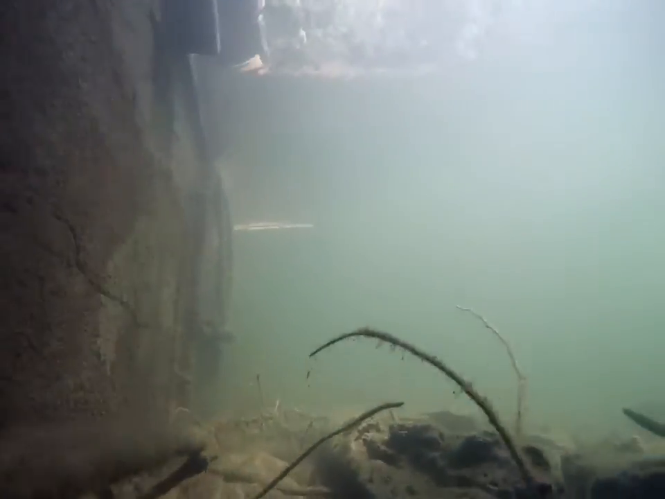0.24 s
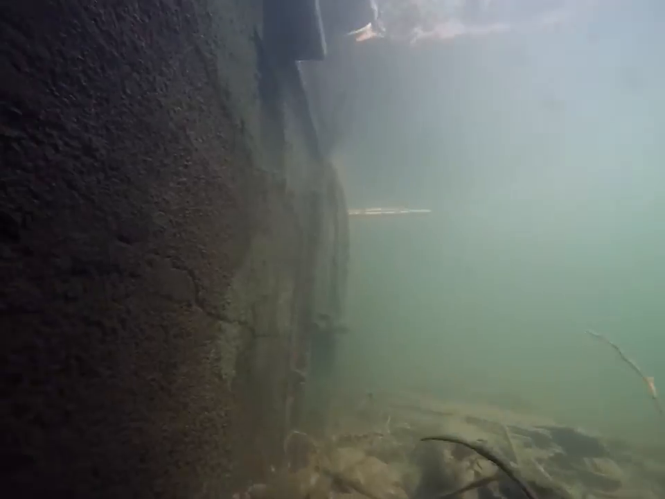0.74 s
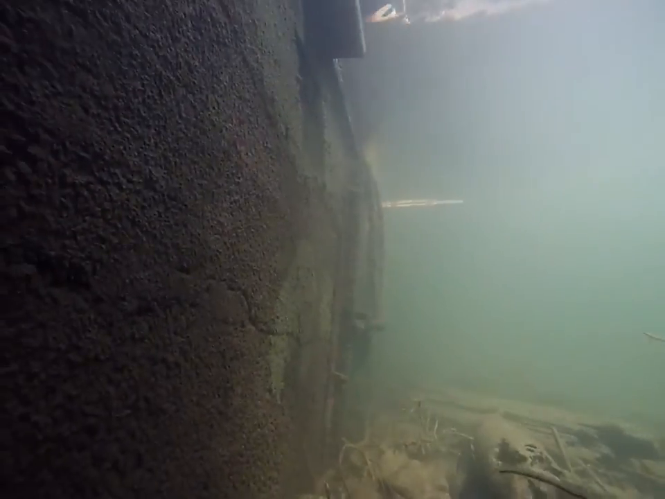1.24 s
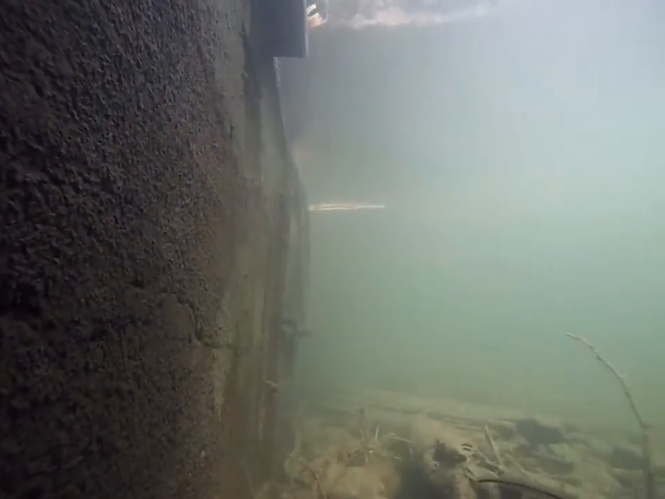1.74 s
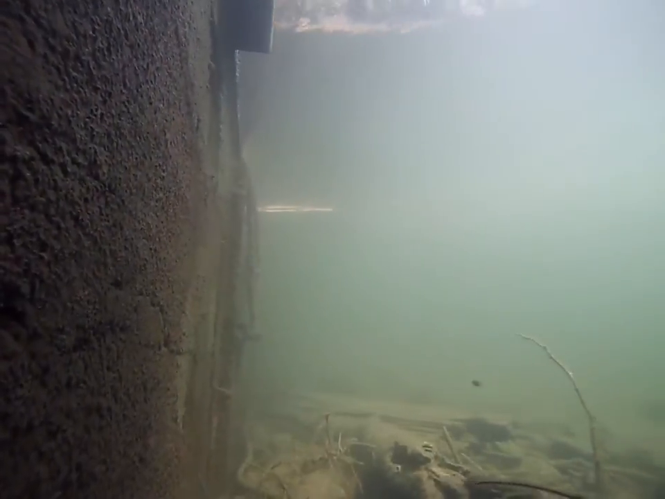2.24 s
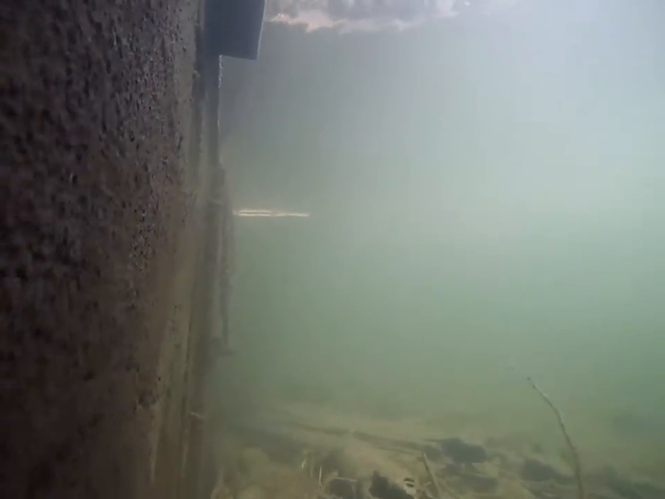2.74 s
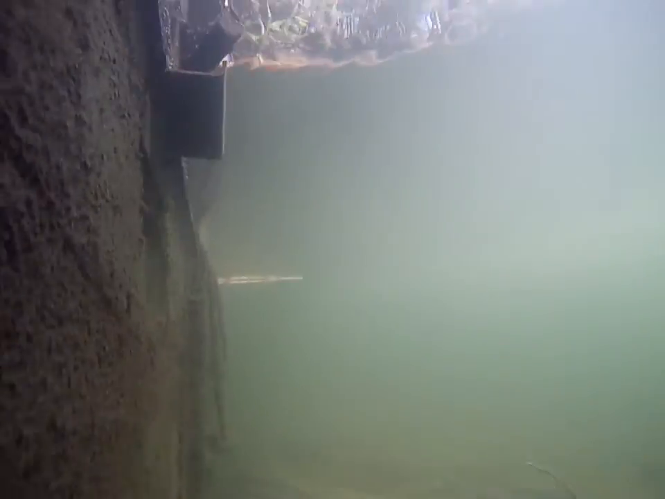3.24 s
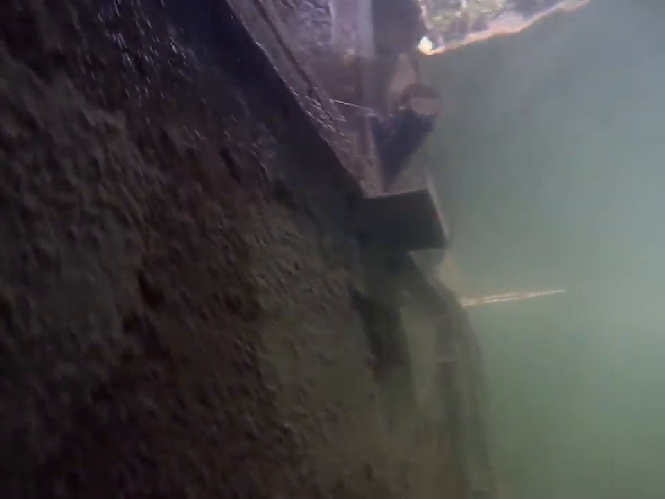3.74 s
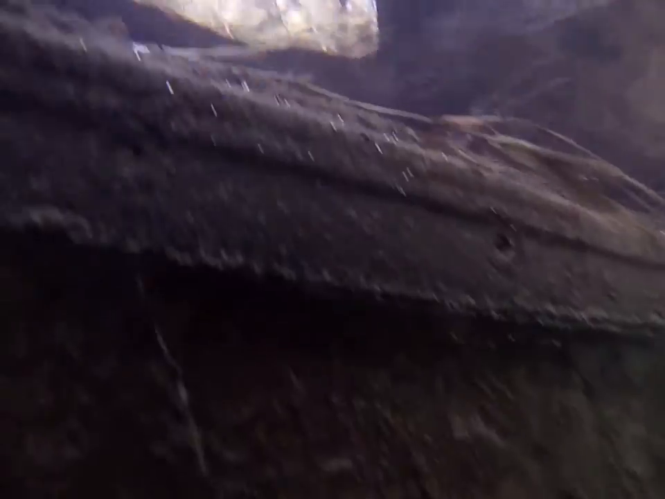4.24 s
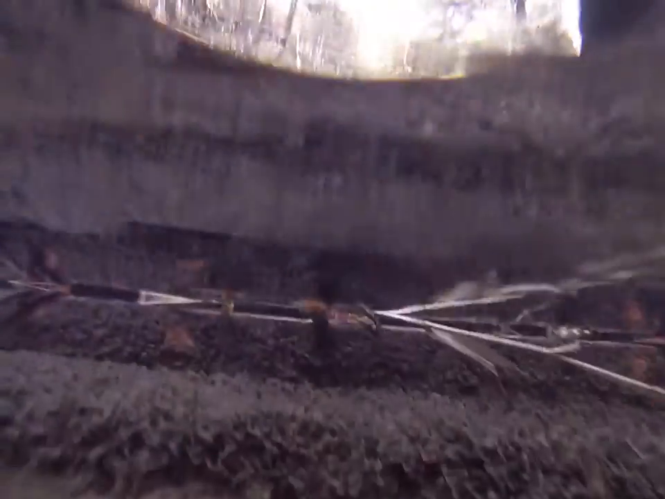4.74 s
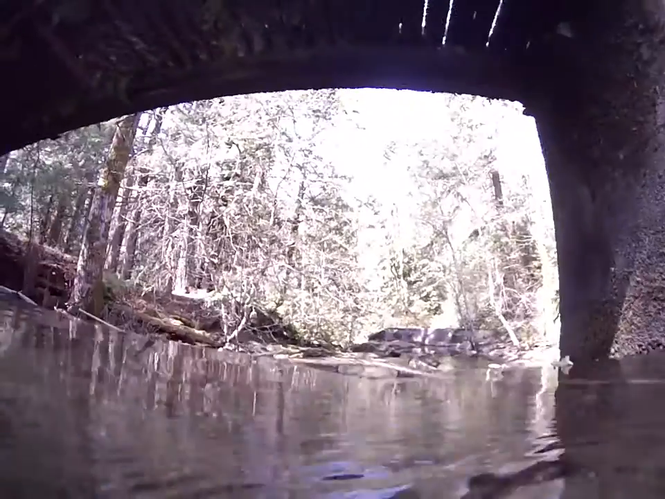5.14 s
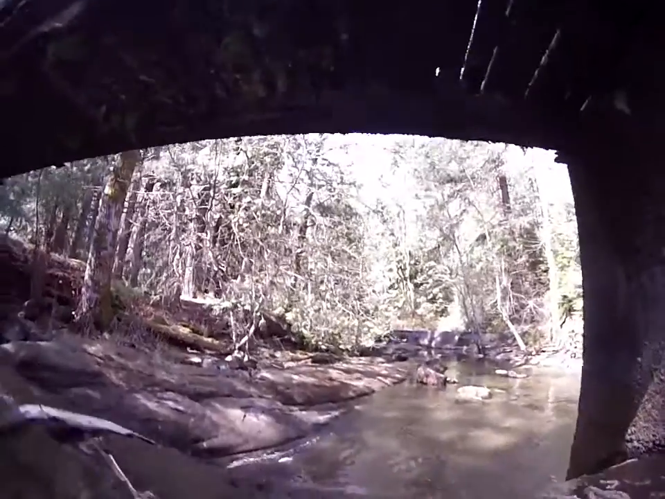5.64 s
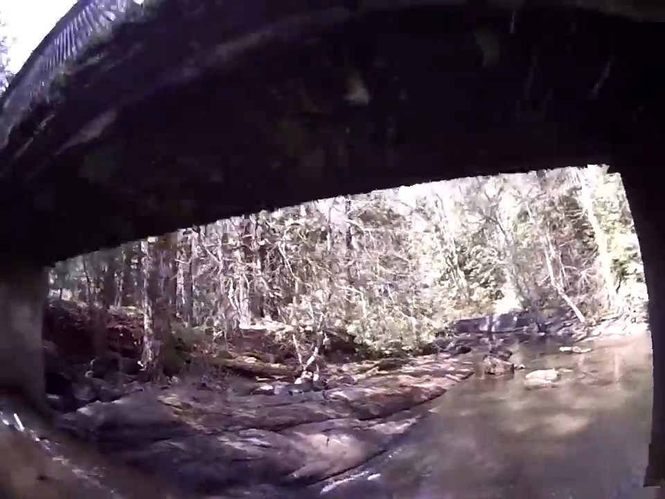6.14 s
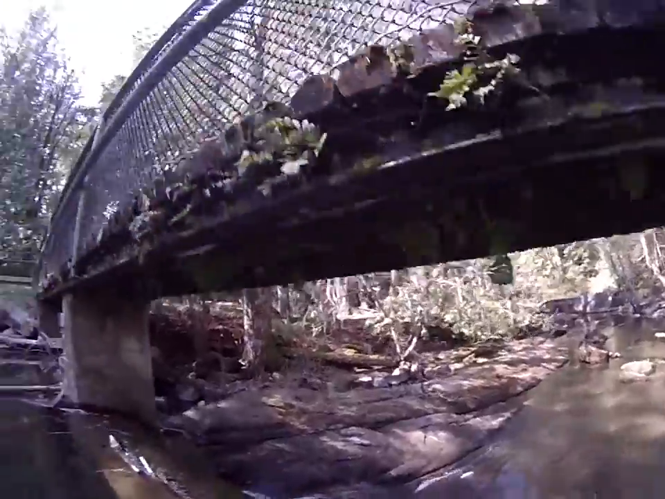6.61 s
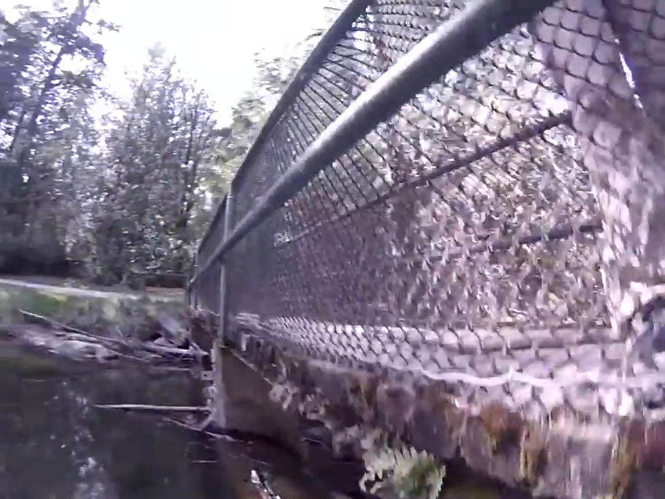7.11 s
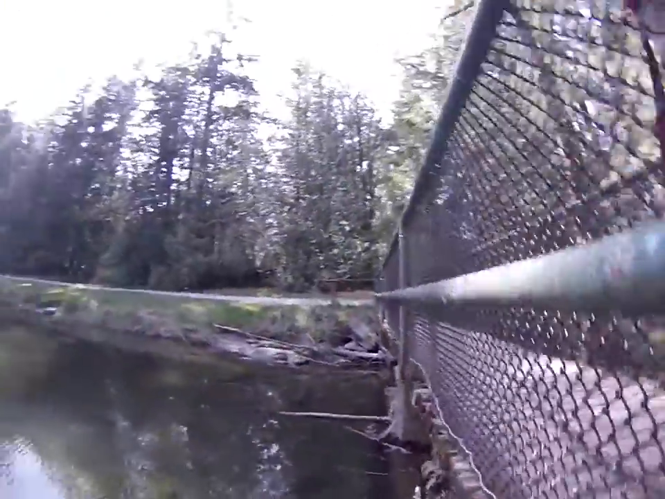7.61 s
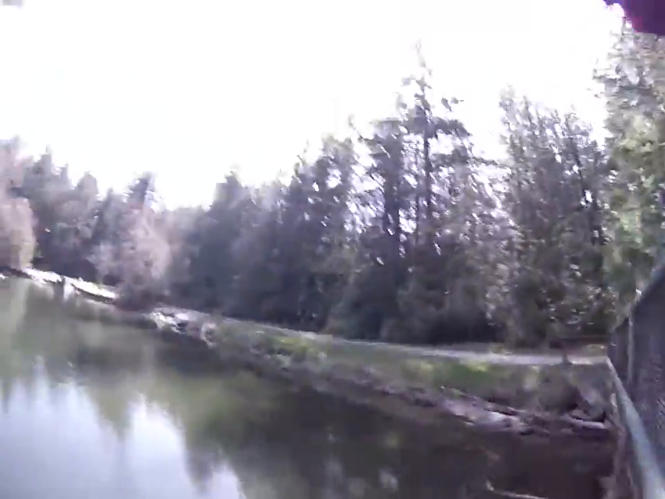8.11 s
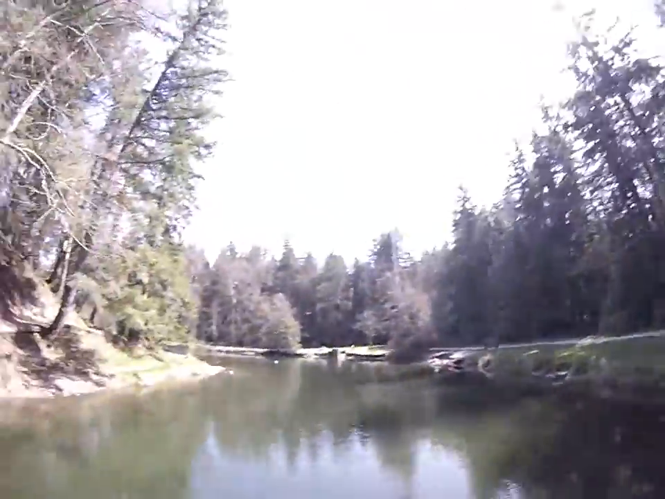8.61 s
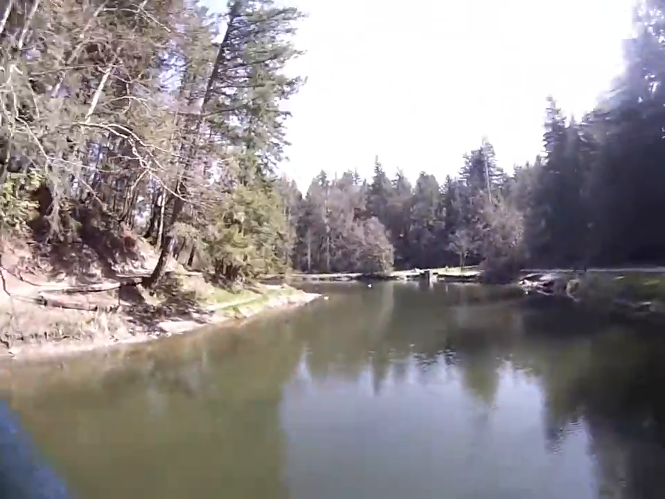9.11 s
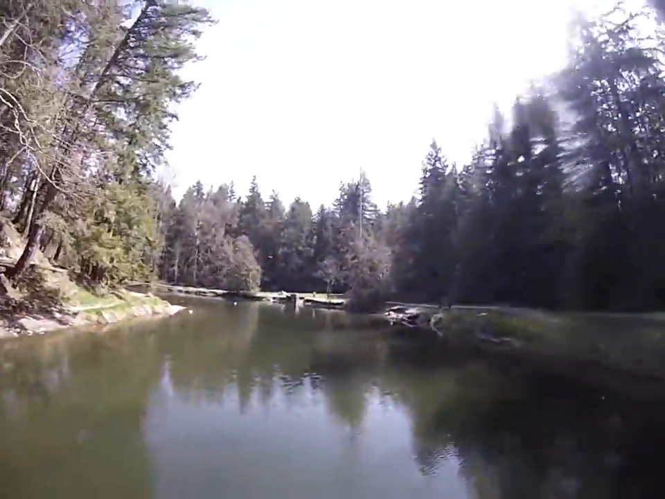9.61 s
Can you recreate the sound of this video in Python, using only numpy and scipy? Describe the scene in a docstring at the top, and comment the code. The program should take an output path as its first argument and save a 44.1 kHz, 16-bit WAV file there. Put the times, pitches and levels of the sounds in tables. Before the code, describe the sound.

Heard from inside a sealed plastic housing on a pole: a burst of loud, boomy knocks and scrapes, then low humming shudders over dull underwater hiss. Bubbles blip upward and hollow ticks follow as it rises. In open air a faint stream hisses through the shell, the mount trembles in short buzzing bursts, and fingers finally knock and rub the case loudly.

```python
"""Camera housing lifted from a pond

A camera in a sealed plastic housing is lifted on a pole out of a pond and then handled.
Filtered noise makes the water hiss, the stream heard through the shell, and the shaking of the sprung mount.
Pushes set the mount swinging; air pockets pop as climbing tones, and soft pings swell and fade.
Fingers rub in grains of noise and tap the shell's resonances. The gain control ducks after loud knocks.
"""
import sys
import numpy as np
from scipy import signal
from scipy.fft import rfft, irfft, next_fast_len
from scipy.io import wavfile
from scipy.ndimage import uniform_filter1d, map_coordinates

SR = 44100
rng = np.random.default_rng(int(sys.argv[2]) if len(sys.argv) > 2 else 0)


def unload_audio(sound):
    """Save the sound as a 16-bit wav file, at the path given as the first command line argument."""
    columns = np.transpose(np.atleast_2d(sound))
    # keep every value between -1 and 1, then stretch to whole-number steps
    steps = np.round(np.clip(columns, -1, 1) * 32767)
    wavfile.write(sys.argv[1], SR, steps.astype(np.int16))


def voltage_ratio(decibels):
    """Convert decibels (scalar or array-like) to amplitude ratios, 20 dB per decade."""
    exponent = np.asarray(decibels, float) / 20
    return 10 ** exponent


N = 434804
T = np.arange(N) / SR  # time of every sample, s

# resonances of the plastic shell: f/Hz, width/Hz, level/dB
SHELL_MODES = [(675, 2270, -5.5), (1464, 174, 11), (2133, 280, 8.5), (3530, 830, -2), (4580, 600, -5.5),
               (7700, 2300, -19)]


def unit(x):
    """Scale a sound to rms 1."""
    return x / np.sqrt(np.mean(x ** 2) + 1e-20)


def curves(rows):
    """Draw straight lines between table rows: one curve for each column after the time."""
    s, *cols = np.transpose(rows)
    return [np.interp(T, s, c) for c in cols]


def wobble(rate):
    """Make a smooth random curve with rate random points a second."""
    return map_coordinates(rng.standard_normal(int(N * rate / SR) + 4), [T * rate])


def filtered(x, response):
    """Multiply the spectrum of x by a response, which may be complex."""
    m = next_fast_len(len(x) + 8192)  # spare room for the ringing
    hz = np.fft.rfftfreq(m, 1 / SR) + 1  # the 1 keeps clear of zero
    return irfft(rfft(x, m) * response(hz), m)[:len(x)]


def colour(points):
    """Join (f/Hz, level/dB) points into a gain curve over a log frequency axis."""
    f, db = np.transpose(points)
    return lambda hz: voltage_ratio(np.interp(np.log(hz), np.log(f), db))


def modes(rows):
    """Add up resonances of alternating sign, each given as (f/Hz, width/Hz, level/dB)."""
    def response(f):
        total = 0
        for k, (c, w, db) in enumerate(rows):
            total = total + (-1) ** k * voltage_ratio(db) * 1j * f * w / (c * c - f * f + 1j * f * w)
        return total
    return response


def add(track, s, sound):
    """Mix a sound into a track, starting at s seconds."""
    part = track[max(round(s * SR), 0):][:len(sound)]
    part += sound[:len(part)]


def patchy_noise(noise, window, patch_db, bins, frames):
    """Raise and lower small patches of a noise, each some bins high and some frames long."""
    z = signal.stft(noise, nperseg=window)[2]
    field = uniform_filter1d(rng.standard_normal(z.shape), size=bins, axis=0)
    field = uniform_filter1d(field, size=frames, axis=1)
    return signal.istft(z * voltage_ratio(patch_db * unit(field)), nperseg=window)[1][:N]


def surroundings(dry):
    """Water hiss in faint patches gives way to a steady stream heard through the shell."""
    # middle level of the noise under water, and then in air: t/s, level/dB
    water_level = [(.2, -48), (3.8, -46.5), (5.0, -54)]
    air_level = [(4.8, -54.5), (5.6, -50.5), (6.6, -54.5), (9.8, -57.5)]
    # relative colour through the shell, under water and in air: f/Hz, level/dB
    water_tone = [(88, -12), (150, -5.5), (201, -4), (497, -8), (706, -1.5), (818, -9), (1140, -13),
                  (1230, -23.5), (1370, -16.5), (1590, -20.5), (2130, -18.5), (2660, -28.5), (12300, -46.5),
                  (16000, -75), (22000, -120)]
    air_tone = [(150, -58), (200, -9.5), (500, -10), (1100, -9.5), (1480, 1.5), (1850, -8), (2300, -2.5),
                (2750, -14), (3550, -12), (5500, -21.5), (12300, -37.5), (16000, -81), (22000, -120)]
    hiss = patchy_noise(rng.standard_normal(N), 512, 1.2, 4, 8)
    water_db = curves(water_level)[0] + 0.46 * wobble(11)
    water = voltage_ratio(water_db) * unit(filtered(hiss, colour(water_tone)))
    stream_db = curves(air_level)[0] + 0.93 * wobble(2.186)
    stream = voltage_ratio(stream_db) * unit(filtered(rng.standard_normal(N), colour(air_tone)))
    return np.sqrt(1 - dry) * water + np.sqrt(dry) * stream


def shaking():
    """Shake level in dB: the steady effort on the pole plus tugs that rise to a peak and die away."""
    # steady effort on the pole: t/s, mount shake level/dB
    effort = [(.3, -53.5), (.56, -69), (1.0, -40), (1.55, -43), (1.85, -49), (2.2, -72), (2.32, -40),
              (2.95, -36.5), (3.4, -42.5), (4.05, -43.5), (4.3, -42), (4.9, -56), (5.25, -29.5),
              (5.7, -32.5), (5.9, -44.5), (6.5, -54), (7.9, -47), (8.6, -50.5), (9.6, -34)]
    # tugs on the pole: peak t/s, mount shake level/dB, length/s
    tugs = [(0, -13, 0.3), (1.09, -33, 0.068), (1.35, -35, 0.29), (1.68, -29.5, 0.3), (2.526, -25.5, 0.3),
            (2.97, -31, 0.1), (3.148, -30, 0.11), (3.706, -26, 0.14), (4.157, -34, 0.26),
            (5.302, -23, 0.12), (5.42, -19.5, 0.065), (5.536, -23.5, 0.098), (5.748, -19, 0.089),
            (6.702, -32, 0.33), (6.897, -28.5, 0.077), (7.325, -30.5, 1), (7.708, -27, 0.24),
            (9.253, -31.5, 0.3)]
    rise_share, range_db = 0.42, 28  # part of the length spent rising; depth of that rise and fall
    power = voltage_ratio(2 * curves(effort)[0])
    t = np.arange(-SR // 2, SR) / SR
    for s, db, length in tugs:
        away = np.maximum(-t / rise_share, t / (1 - rise_share)) / length
        bump = voltage_ratio(2 * (db - range_db * away))
        add(power, max(s - .5, 0), bump[max(round((.5 - s) * SR), 0):])
    return 10 * np.log10(power)


def pole(dry, width_hz=18, steady=0.67):
    """Tremor in the pole keeps the mount ringing near its pitch, rattles the frame and sways the housing."""
    # pitch of the mount, lower under the load of water: wet f/Hz, dry f/Hz
    mount_hz = (86, 108.3)
    # higher modes shaken along, wet and dry; the level counts twice: f/Hz, width/Hz, level/dB
    frame_wet = [(156.6, 44.5, -6.5), (253, 36.5, -6), (402.3, 58, -7.5), (550, 130, -15.5)]
    frame_dry = [(190, 58, -11), (288.7, 52, -8.5), (480, 360, -19)]
    # slow sway of the housing before the tugs act on it: t/s, level/dB
    sway_level = [(0.2, -44.5), (8.67, -35.5), (9.5, -34)]
    shake_db = shaking()

    slow = lambda f: 1 / (1 + 1j * f / width_hz) ** 2
    swing = filtered(rng.standard_normal(N), slow) + 1j * filtered(rng.standard_normal(N), slow)
    swing = swing / abs(swing) ** steady  # the grip evens out the size of the swings, not their timing
    turns = np.cumsum(np.interp(dry, [0, 1], mount_hz)) / SR
    mount = unit((swing * np.exp(2j * np.pi * turns)).real)
    mount = unit(filtered(mount, lambda f: 1 / (1 + (f / 150) ** 6)))

    jolts = voltage_ratio(4.5 * wobble(18)) * rng.standard_normal(N)
    level = np.sqrt(np.pi * 30 / SR)  # rms that white noise keeps through a 30 Hz wide resonance
    # drive and pickup both pass the modes, which leaves dark valleys between them
    sharp = lambda rows: lambda f: modes(rows)(f) ** 2
    wet_frame, dry_frame = filtered(jolts, sharp(frame_wet)), filtered(jolts, sharp(frame_dry))
    frame = ((1 - dry) * wet_frame + dry * dry_frame) / level
    slow_db = uniform_filter1d(shake_db, size=SR // 14)  # the frame answers a little sluggishly
    rattle_db = slow_db - 0.091 * dry * (slow_db + 40.5)  # out of the water it follows hard efforts less

    lurches = voltage_ratio(4 * wobble(13)) * rng.standard_normal(N)
    sway_tone = [(4, -19.5), (18, -4.5), (45, -19.5), (70, -16.0), (160, -34.5), (400, -73.5)]  # f/Hz, level/dB
    sway = unit(filtered(lurches, colour(sway_tone)))
    sway_db = curves(sway_level)[0] + 0.22 * (shake_db - shake_db.mean())  # tugs sway the housing too
    return voltage_ratio(shake_db) * mount + voltage_ratio(rattle_db) * frame + voltage_ratio(sway_db) * sway


def thuds(t60=0.079):
    """A smooth push, the harder the shorter, is answered by a dying swing of the mount."""
    # pushes on the mount: t/s, peak level/dB, direction (in +1, out -1), ring f/Hz
    pushes = [(0.027, -6.5, -1, 86), (0.053, 0.5, 1, 120), (0.068, 10.5, -1, 44.7), (0.092, 3.5, -1, 60.7),
              (0.136, 0.5, -1, 85.5), (2.796, -19.5, 1, 58.7), (4.207, -12.5, -1, 73),
              (4.415, -22.5, 1, 37.4), (5.157, -16.5, -1, 79.4), (6.735, -22.5, 1, 55.6),
              (7.431, -30.5, -1, 192), (8.723, 0.5, -1, 91), (8.831, -7, -1, 102), (8.841, -1, -1, 103),
              (8.916, -3.5, -1, 92), (9.527, 1.5, -1, 68.5), (9.557, -13, -1, 79.4), (9.678, -17.5, -1, 61),
              (9.769, -14, 1, 96), (9.781, -12.5, -1, 114), (9.831, -1.5, -1, 130), (9.84, 7.5, -1, 35.7),
              (9.854, 12, 1, 76)]
    push_ms, longer_db = 1.11, 1.5  # bell width of a 0 dB push; dB of width gained per dB of weakness
    out, t = np.zeros(N), np.arange(SR // 4) / SR
    for s, db, way, hz in pushes:
        width = min(push_ms * voltage_ratio(-longer_db * db) / 1000, .2 / hz)  # s, kept short against one swing
        lead = 4 * width
        push = np.exp(-.5 * ((t[:round(2 * lead * SR)] - lead) / width) ** 2)
        swing = np.diff(voltage_ratio(-60 * t / t60) * np.sin(2 * np.pi * hz * t), prepend=0)
        knock = signal.fftconvolve(push, swing)
        add(out, s - lead, np.sign(way) * voltage_ratio(db) * knock / abs(knock).max())
    return out


def tone(t, hz, climb, t60=0.049):
    """A dying tone whose pitch may climb; low tones last longer."""
    longer = (1500 / hz) ** 0.54 + (480 / hz) ** 3
    return voltage_ratio(-60 * t / t60 / longer) * np.sin(2 * np.pi * hz * t * (1 + climb * t))


def cracks(contacts, t60=0.018):
    """Short noise bursts around each contact's pitch (t/s, level/dB, f/Hz), coloured by the shell."""
    foot, top = 1, 4.7  # a crack spans these multiples of the pitch
    out, t = np.zeros(N), np.arange(SR // 8) / SR
    for s, db, hz in contacts:
        span = lambda f: 1 / (1 + (f / (top * hz)) ** 2) / (1 + (foot * hz / f) ** 2)
        burst = filtered(rng.standard_normal(len(t)), span)
        add(out, s, voltage_ratio(db - 60 * t / t60) * burst)
    brighter = lambda f: (0.63 + 1j * f / 3000) / (1 + 1j * f / 7000) ** 2  # a sharp blow favours high modes
    return filtered(out, lambda f: modes(SHELL_MODES)(f) * brighter(f))


def bubbles(climb=0.87):
    """Air pockets pop out of the housing: each rings as a climbing tone and cracks as its neck closes."""
    # air pockets, some in pairs: t/s, level before the envelope/dB, starting f/Hz
    pockets = [(0.252, -11, 1650), (4.038, -17, 2420), (3.666, -19.5, 417), (3.704, -25, 460),
               (3.704, -21.5, 697), (3.714, -26, 345), (3.716, -30, 607), (3.763, -9.5, 1204),
               (2.252, -30, 640), (5.815, -30.5, 1490), (3.876, -10.5, 1655), (3.876, -10, 2524),
               (4.545, -21.5, 703), (4.815, -22, 720), (4.846, -31, 1680), (9.245, -23, 290)]
    crack_db, start_cycles = -23.5, 0.57  # crack against tone; soft start
    snap, snap_cycles = 4.7, 5.8  # extra swing of the first cycles
    out, t = np.zeros(N), np.arange(SR // 8) / SR
    for s, db, hz in pockets:
        start = (1 - np.exp(-t * hz / start_cycles)) ** 2
        strength = (1 + snap * np.exp(-t * hz / snap_cycles)) / (1 + snap)
        add(out, s, voltage_ratio(db) * tone(t, hz, climb) * start * strength)
    return out + cracks([(s, db + crack_db, hz) for s, db, hz in pockets])


def pings():
    """Soft pure tones, perhaps droplets, swell and fade within 7 ms."""
    # pings: start t/s, peak level/dB, f/Hz
    drops = [(0.2511, -18.5, 820), (4.293, -42, 2080), (4.42, -35, 2030), (7.5675, -22, 2117),
             (7.5665, -52.5, 5050)]
    out, t = np.zeros(N), np.arange(SR // 8) / SR
    for s, db, hz in drops:
        swell = np.sin(np.pi * np.minimum(t / 0.007, 1) ** 0.56) ** 2
        add(out, s, voltage_ratio(db) * np.sin(2 * np.pi * hz * t) * swell)
    return out


def rubs(edge=0.31, longest=0.018):
    """Skin slips over the shell in grains of shifting colour; bright strokes are abrupt, dull ones swell and fade."""
    # finger strokes and scrapes: start t/s, length/s, rms level before the edges/dB,
    # brightness/(dB per octave), f/Hz that the grip leaves free to ring
    strokes = [(0, 0.08, -27, 2, 1880), (0.054, 0.012, -17.5, 0.5, 455), (0.106, 0.018, -3, -13.5, 855),
               (0.124, 0.0034, -15, -0.5, 1300), (3.668, 0.045, -37, -39, 504),
               (7.386, 0.34, -44, -7.5, 1380), (7.425, 0.0084, -44, -24, 400),
               (7.67, 0.038, -49, -6.5, 1500), (8.716, 0.061, -28.5, 0.5, 1410),
               (8.824, 0.055, -14.5, 2.5, 4330), (8.912, 0.11, -37, 0.5, 1600),
               (8.955, 0.036, -35, 1.5, 2710), (9.036, 0.033, -36.5, 0.5, 2300),
               (9.066, 0.031, -23.5, 0, 1800), (9.121, 0.064, -36.5, 1, 1630), (9.19, 0.031, -31, 1, 4670),
               (9.221, 0.052, -37, -1.5, 2670), (9.3, 0.13, -50, -3, 2010), (9.527, 0.0053, -40, 12, 4040),
               (9.593, 0.046, -43, -5.5, 1510), (9.68, 0.088, -32.5, -5, 764),
               (9.76, 0.008, -40.5, 11.5, 3230), (9.768, 0.1, -32.5, -7.5, 675),
               (9.826, 0.0021, -13, 19.5, 8630), (9.83, 0.024, -21, 4, 3520)]
    grain_db, patch_db = 2.2, 1.8  # unevenness of the slips in time and in colour
    free_db, free_oct = 7, 0.24  # lift and spread of the part of the shell left free
    slips = voltage_ratio(grain_db * wobble(200)) * rng.standard_normal(N)
    grains = patchy_noise(slips, 256, patch_db, 3, 5)
    out, shell = np.zeros(N), modes(SHELL_MODES)
    for s, length, db, tilt_db, hz in strokes:
        # edge time in s: a share of the length, shorter for bright strokes
        soft = min(edge * length, longest) * np.exp(-max(tilt_db, 0) / 2.8)
        t = np.arange(round((length + 6 * soft) * SR)) / SR
        piece = np.resize(grains[round(s * SR):], len(t))

        def grip(f):
            tilt = tilt_db * np.log2(np.maximum(f, 650) / 2000)
            return voltage_ratio(tilt + free_db * np.exp(-.5 * (np.log2(f / hz) / free_oct) ** 2))

        stroke = unit(filtered(piece, lambda f: shell(f) / (1 + (f / 5200) ** 1.64) * grip(f)))
        swell = 1 - np.exp(-t / soft)
        fade = np.exp(-np.maximum(t - length, 0) / soft)
        add(out, s, voltage_ratio(db) * swell * fade * stroke)
    return out


def taps(start_s=0.00014):
    """A fingertip starts the shell modes near the pitch of its contact, damps them and adds a crack."""
    # taps: t/s, level before the envelope/dB, pitch the contact favours f/Hz, crack over ring level/dB
    touches = [(0.051, -1, 585, -6), (.043, -24, 2020, -11), (.114, 0.5, 870, 7.5),
               (3.391, -23, 2060, -6.5), (3.598, -56, 5500, 28), (3.817, -22.5, 2020, -21),
               (4.038, -18.5, 1900, -8), (4.509, -33.5, 1610, -3), (4.545, -23, 1410, -4),
               (4.673, -23.5, 1230, -3), (4.814, -20, 1400, -5), (4.932, -42.5, 6500, 18),
               (5.127, -32.5, 2460, -8), (5.203, -28.5, 1440, 4.5), (8.186, -26, 2600, -20),
               (8.721, 2.5, 2440, -4), (8.915, -29, 2000, 7), (9.676, -29, 1480, -4),
               (9.73, -18.5, 2340, -4), (9.765, -15, 1070, -2), (9.827, -8, 1430, 6.5)]
    # modes a tap can start: f/Hz, relative level/dB
    tap_modes = [(400, 6), (700, 3), (930, 3), (1400, 9), (1650, 10.5), (2060, 6.5), (2450, -6),
                 (2950, 0.5), (3400, -1)]
    reach_oct, damp_s = 0.28, 0.0039  # spread of the contact's spectrum; the finger damps the ring
    out, t = np.zeros(N), np.arange(SR // 8) / SR
    envelope = (1 - np.exp(-t / start_s)) ** 2 * np.exp(-t / damp_s)
    mode_hz, mode_db = np.transpose(tap_modes)
    for s, db, hz, crack_db in touches:
        gains = voltage_ratio(mode_db) * np.exp(-.5 * (np.log2(mode_hz / hz) / reach_oct) ** 2)
        ring = sum(g * tone(t, f, 0) for g, f in zip(gains, mode_hz)) / np.linalg.norm(gains)
        add(out, s, voltage_ratio(db) * ring * envelope)
    return out + cracks([(s, db + crack_db, hz) for s, db, hz, crack_db in touches])


def scene():
    """All sources reach the microphone through the housing."""
    # the housing leaves the water: from t/s, to t/s
    surfacing = (4.725, 5.16)
    dry = np.interp(T, surfacing, [0, 1])  # 0 under water, 1 in air
    background = surroundings(dry) + pole(dry)
    handling = thuds() + bubbles() + pings() + rubs() + taps()
    return (background + handling)[None]


def band_limit(x):
    """A steep low-pass at the top of the band."""
    return signal.sosfilt(signal.butter(12, 12460, fs=SR, output="sos"), x)


def record(dry, knee_db=-13, ratio=0.77, release_db=130, attack=0.0034):
    """Gain drops just after a loud peak and climbs back by release_db a second; the loudest peaks clip."""
    over = ratio * np.maximum(20 * np.log10(abs(dry) + 1e-9) - knee_db, 0)
    held = np.maximum.accumulate(over + release_db * T, axis=1) - release_db * T
    k = 1 / (attack * SR)  # attack in s, smoothed twice
    once = signal.lfilter([k], [1, k - 1], held)
    duck_db = signal.lfilter([k], [1, k - 1], once)
    ducked = dry * voltage_ratio(-duck_db)
    return band_limit(np.clip(ducked, -1, 1))


dry = scene()
out = record(dry)
unload_audio(out)
```